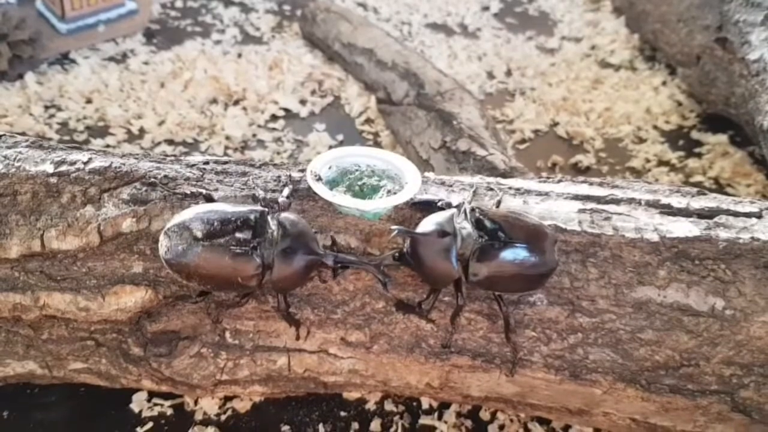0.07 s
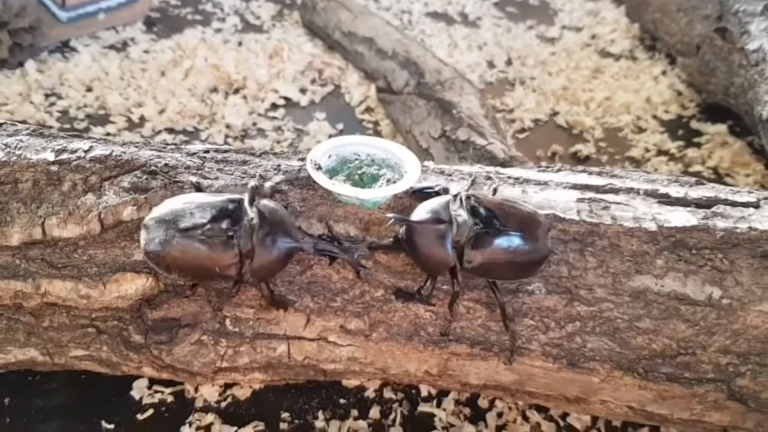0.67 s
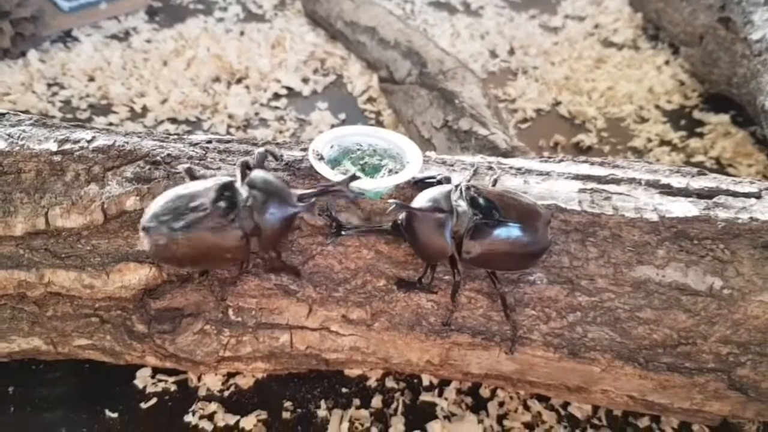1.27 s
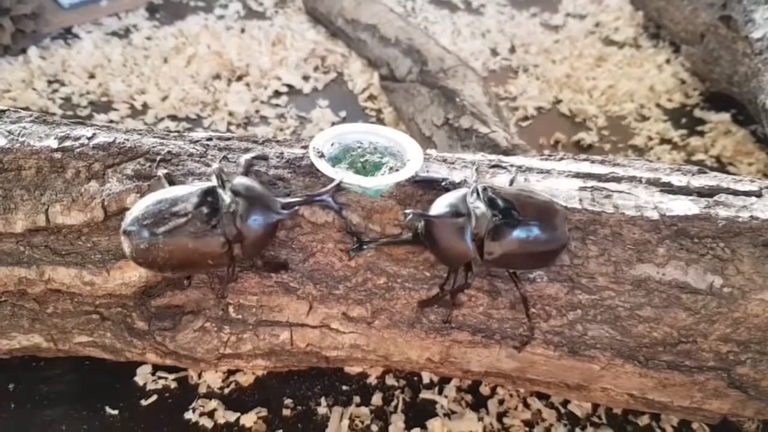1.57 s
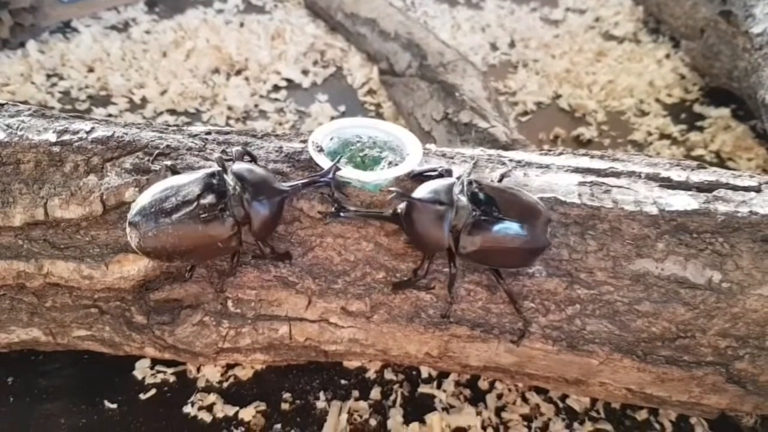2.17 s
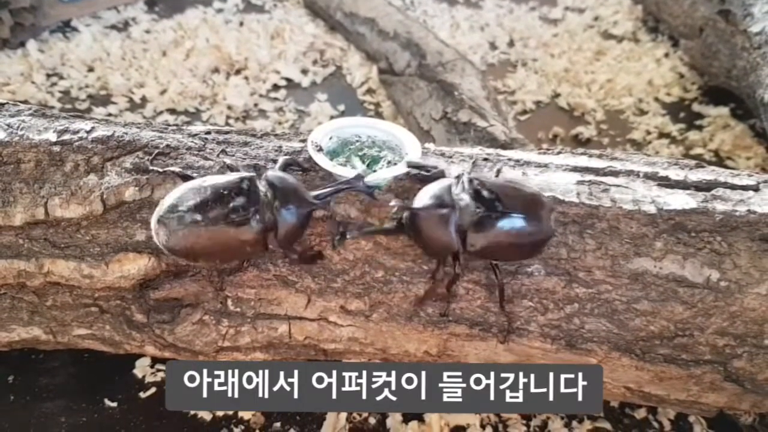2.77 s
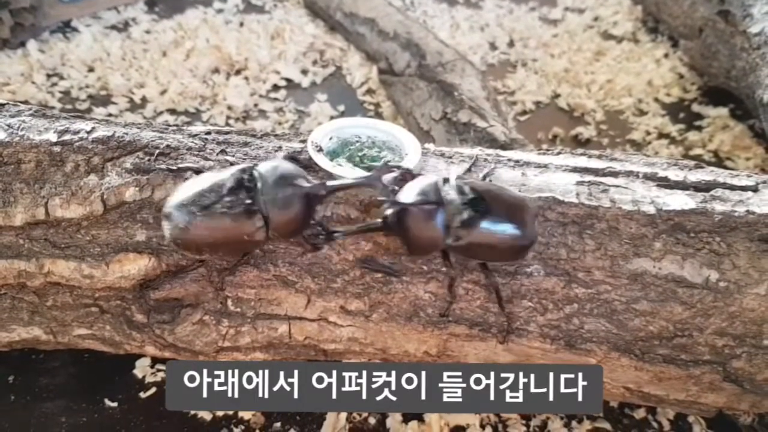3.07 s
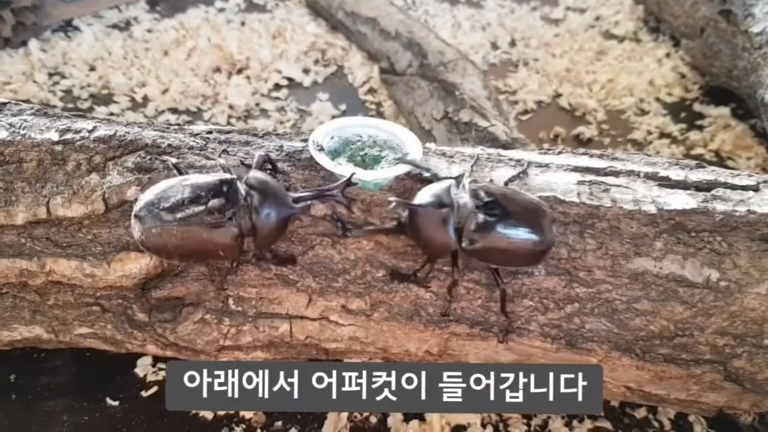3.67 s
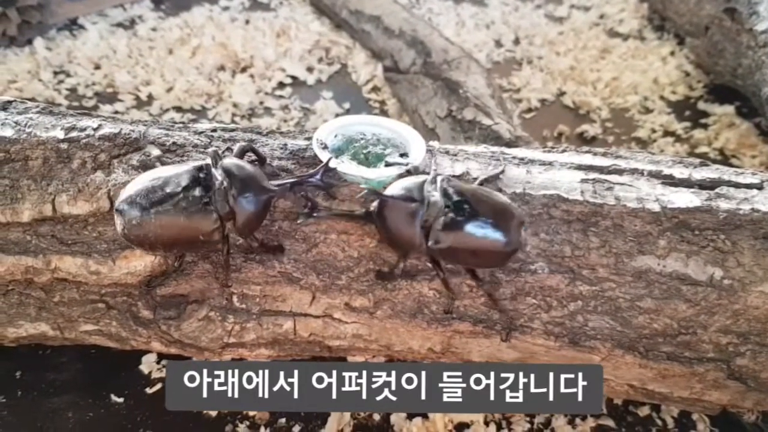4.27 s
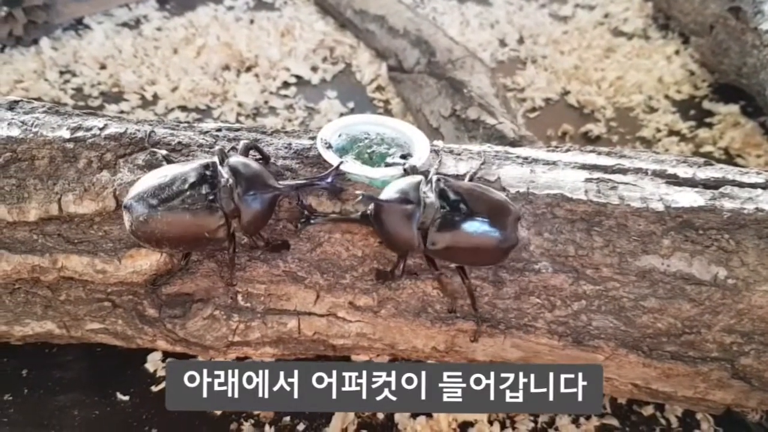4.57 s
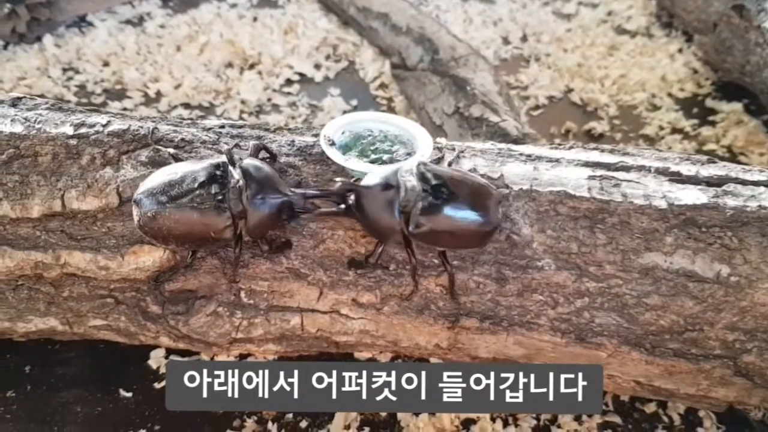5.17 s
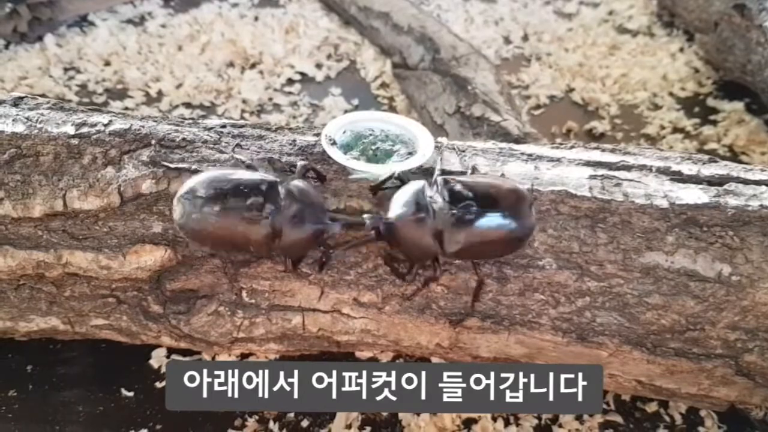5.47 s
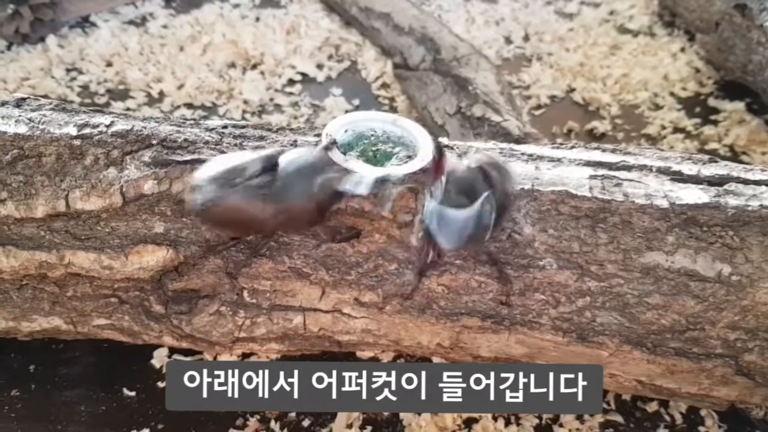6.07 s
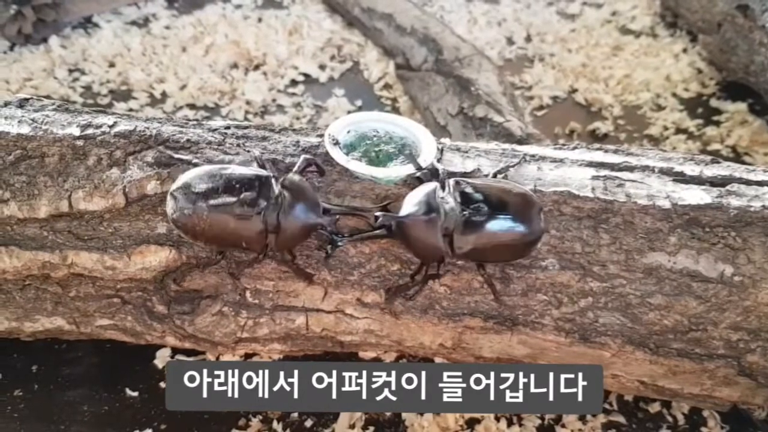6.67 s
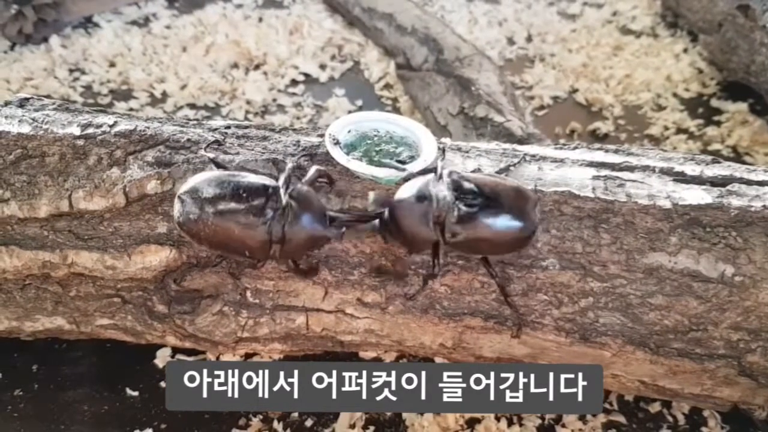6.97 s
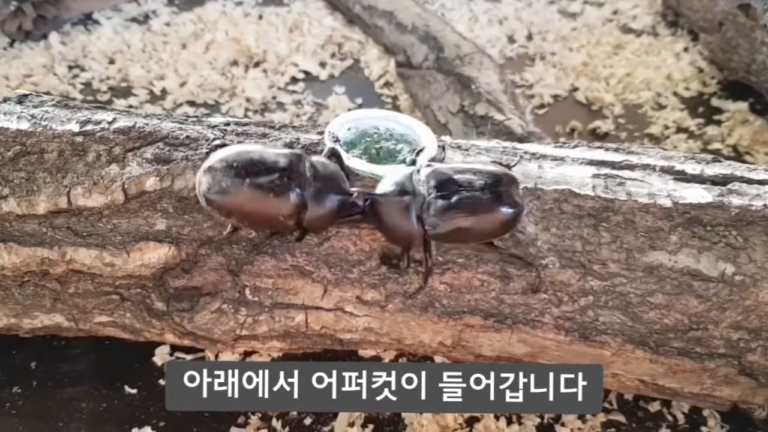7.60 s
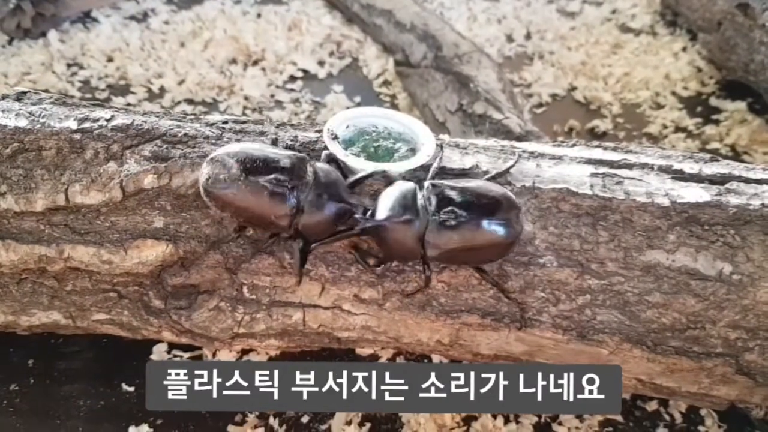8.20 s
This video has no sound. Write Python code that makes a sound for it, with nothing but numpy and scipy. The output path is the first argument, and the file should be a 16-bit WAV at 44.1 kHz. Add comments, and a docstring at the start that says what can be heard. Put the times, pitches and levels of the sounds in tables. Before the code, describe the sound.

Faint, grainy scraping and tiny clicks come from two big beetles gripping bark close to the microphone. After about five seconds, four bouts of hard shoving follow, each with brittle cracks of horn on shell, crunchy claw drags and dull knocks from the rocking log. A little cup gives a few short rings. A low room rumble and a soft appliance hum continue underneath.

```python
"""Beetles wrestling on a log

Two large beetles fight close by in a quiet room; an appliance hums in the background.
Claws drag over bark in dense stick-slip grains. Horns snap past each other and clack on shells.
Hard shoves rock the log with a low thud and jolt a small cup, which rings."""
import sys
import numpy as np
from scipy import signal
from scipy.fft import rfft, irfft, next_fast_len
from scipy.io import wavfile
from scipy.ndimage import uniform_filter1d, map_coordinates

SR = 44100
rng = np.random.default_rng(int(sys.argv[2]) if len(sys.argv) > 2 else 0)


def digitize_waveform(pressure):
    """Quantize a signal to 16-bit integers and store it at the path in sys.argv[1].

    Rows of a 2-D input are taken as channels; values are limited to [-1, 1].
    """
    field = np.atleast_2d(pressure).T
    bounded = np.clip(field, -1, 1)
    quanta = np.round(bounded * 32767).astype(np.int16)
    wavfile.write(sys.argv[1], SR, quanta)


N = 372204

# room noise spectra: f/Hz, density/dB
RUMBLE_SPECTRUM = [(15, -60), (25, -37), (35, -8.5), (49, -10), (70, -5), (91, -7), (113, -0.5), (166, -1),
                   (189, -10.5), (253, -3), (289, -7), (608, -20.5), (800, -16), (1200, -38.5), (1560, -53),
                   (2640, -120)]
HISS_SPECTRUM = [(500, -3.5), (1100, -1.5), (2100, -3), (3000, -16.5), (5000, -20), (8200, -23),
                 (11000, -17), (15500, -25)]
# appliance tones: f/Hz, level/dB
HUM_TONES = [(119, -55.5), (124, -60.5)]
# swells of its lowest and highest tone: t/s, level/dB
MAINS_SWELL = [(0, -51.5), (.6, -58), (1.15, -44.5), (1.65, -60), (2.2, -50.5), (3.2, -53.5), (4.2, -55),
               (4.75, -46.5), (5.2, -57), (6.9, -56), (8.4, -48.5)]
DRONE_SWELL = [(0, -52.5), (.5, -64.5), (1.35, -50.5), (2.6, -57), (4, -65.5), (5.3, -52.5), (6.2, -63.5),
               (8.4, -52)]
# left-right likeness: f/Hz, coherence
COHERENCE = [(60, 0.75), (130, 0.86), (290, 0.91), (640, 0.64), (1400, 0.023), (4000, 0.015),
             (15000, 0.077)]
# room decay: f/Hz, t60/s
ROOM_DECAY = [(200, 0.072), (1800, 0.31), (6000, 0.13), (15000, 0.0072)]

# resonances of log, bark with shell, and microphone ports: f/Hz, width/Hz, gain/dB
LOG_MODES = [(86.1, 19.7, 1.5), (124, 39.5, 1), (201, 35, -7), (293.4, 12, -21.5)]
BODY_MODES = [(1360, 850, 0), (1650, 42, -6), (1830, 51, -8.5), (2830, 390, -10), (4320, 340, -8.5),
              (5300, 200, -19)]
LEFT_PORT_MODES = [(2440, 81, -8.5), (3640, 300, -0.5), (5700, 900, -16), (13000, 1700, -11)]
RIGHT_PORT_MODES = [(1870, 100, -12), (2900, 350, -2), (6760, 950, 0), (10600, 4300, -8), (15300, 1400, -2)]
# partials of cup and shell: f/Hz, gain/dB, t60/s
CUP_PARTIALS = [(1650, -8, 0.11), (1780, 2.5, 0.098), (2380, -5, 0.087), (2900, -4, 0.11)]
SHELL_PARTIALS = [(1930, -12, 0.0083), (2780, -12, 0.0066), (3690, -4, 0.0037), (4170, 0.5, 0.0051),
                  (4920, -5, 0.0068), (6520, -10, 0.0046)]
# snap colours, soft to hard: f/Hz, density/dB
KNOCK_SPECTRUM = [(200, -21), (460, 3), (700, -9), (1100, -20), (1650, 2.5), (2500, -9.5), (4000, -14.5)]
CRACK_SPECTRUM = [(1500, -27), (2900, 1.5), (3200, -6.5), (3750, -1), (4500, 2.5), (5400, -0.5),
                  (6400, -4.5), (9000, -13)]
TICK_SPECTRUM = [(4500, -10), (7200, -4), (11000, 1.5), (15500, 5)]
PIN_SPECTRUM = [(8000, -19), (12000, -12), (14000, -2), (15500, 1)]
# drag colours: f/Hz, density/dB
SCRATCH_SPECTRUM = [(4000, -30), (6500, -6.5), (8300, -4), (11000, 2), (13000, -2), (15500, 3.5)]
CRUNCH_SPECTRUM = [(1500, -51), (2600, -10), (3200, 2), (3700, 5.5), (5500, 3), (7000, -9), (10000, -21)]
RASP_SPECTRUM = [(120, -40), (270, 3.5), (450, 11), (600, 1.5), (800, 3), (1130, -6.5), (1600, 0),
                 (2400, -1.5), (3200, -12), (6000, -48)]

# log settles after a shove, or a beetle lands: t/s, level/dB, tilt/(dB/octave)
LOG_THUDS = [(2.97, -36, -14), (5.426, -22.5, -10), (5.458, -32, -3), (5.482, -26, -7), (5.53, -32, -8),
             (6.004, -37, 7.5), (6.02, -29, 1), (7.168, -29.5, -1), (7.204, -35, 6.5), (7.262, -34.5, 5),
             (7.311, -44.5, 13.5), (7.328, -26.5, -9), (7.49, -29.5, 6), (7.69, -44, 9), (7.716, -32.5, 1),
             (8.265, -42, 4), (8.309, -32, 8)]
# cup is jolted: t/s, level/dB
CUP_JOLTS = [(5.443, -37), (5.469, -38.5), (7.49, -47), (7.787, -57), (8.21, -33), (8.31, -37)]
# claw skates over one ridge: t/s, length/s, f/Hz, level/dB, Q
CLAW_SKIDS = [(0.479, 0.11, 7240, -65, 1.5), (0.548, .009, 7000, -64, 4), (0.644, .012, 7200, -62.5, 2.7),
              (0.846, 0.0097, 7700, -59, 2.2), (1.177, 0.051, 11600, -48.5, 1.2),
              (1.292, 0.092, 12200, -60, 3), (1.2, .19, 2340, -62, 2.3), (1.498, 0.021, 3800, -53, 1.5),
              (2.695, 0.058, 12500, -48.5, 2.1), (2.859, 0.092, 3900, -51.5, 1.5),
              (2.898, .1, 12500, -60, 1.9), (3.294, .045, 13000, -49, 2.1), (3.546, 0.06, 2860, -61, 1.9),
              (4.296, .009, 3700, -56, 1.6), (5.661, 0.008, 6900, -45.5, 3.2),
              (5.675, .006, 7100, -43, 3.5), (7.484, 0.091, 1700, -43, 5.2), (8.192, 0.046, 1770, -38, 6),
              (8.254, 0.043, 1600, -37.5, 4.4), (8.304, 0.096, 2170, -41.5, 1.2)]
# horn strikes shell: t/s, level/dB, pitch ratio, left-right/dB
HORN_CLACKS = [(5.4347, -14.5, 1.24, -7), (5.4423, -20, 0.57, 9), (6.0172, -15, 0.91, 3),
               (6.0212, -15.5, 1.14, -5), (7.3087, -19, 0.88, 1), (7.3095, -15.5, 1.02, 2),
               (7.6896, -24, 0.81, -2), (7.6932, -27.5, 0.67, 11), (8.2722, -23.5, 0.91, 1),
               (8.3165, -27, 0.99, -2)]
# horn, shell or claw slips its hold: t/s, level/dB, hardness (<=0 knock to >=3 pin), left-right/dB
GRIP_SNAPS = [(1.193, -48, 1.8, 0), (1.204, -45, 1.8, 0), (1.3644, -54, 0, -2), (1.4365, -52, 1.2, 2),
              (1.48, -42, 2.5, 7), (2.707, -45.5, 1, 8), (2.868, -38.5, 1.5, 2), (2.882, -43, 5, 2),
              (2.908, -43, 3, 8), (3.069, -42, 1.4, -2), (3.146, -43, 2.5, -9), (3.272, -41, 4, 2),
              (3.293, -36, 2.6, 8), (3.314, -41, 4, 10), (4.1148, -44.5, 8, -2), (5.166, -51, -2, 0),
              (5.2983, -34.5, 1.5, 12), (5.368, -30, 1.6, 10), (5.3935, -29, 1.7, -2), (5.421, -25.5, 2, 8),
              (5.4336, -23, 0.7, -16), (5.434, -24.5, -1.5, 13), (5.4417, -24.5, 0.2, 9),
              (5.455, -30, 2, -4), (5.64, -41, 2.5, -2), (5.6997, -38, 1.5, -3), (5.765, -41, -1, 7),
              (5.804, -29, 1.5, -6), (5.819, -32.5, 1.5, -5), (5.847, -34, 1.5, 3), (5.912, -30, 2.5, -4),
              (5.936, -43, 2.8, 0), (6.002, -27, 0.2, -1), (6.008, -23, 1.8, 6), (6.0135, -25, 0.5, -2),
              (6.0183, -22, 0.9, 1), (6.0214, -15.5, 1.4, 2), (6.024, -23, 2.4, -2), (6.045, -30, 1, 5),
              (6.0722, -38, 6, 6), (6.1175, -34.5, 0, 3.5), (6.1755, -42, 3, 2), (6.272, -43, 2.2, 0),
              (6.3302, -42, 2.3, -5), (6.372, -46, -0.5, 0), (6.4873, -45, 6, 2), (6.518, -42, 1, 1),
              (6.5798, -44, -1.5, 7), (6.656, -55, 2, 0), (6.721, -53, 2, 0), (6.8443, -49, 2.8, 0),
              (7.099, -28.5, 1.5, 5), (7.1194, -28.5, 1, -6), (7.156, -32, 0.5, 0), (7.1641, -19, 1.5, 2),
              (7.186, -35, 0.5, 0), (7.2163, -33, 0.5, -2), (7.3084, -19.5, 0.85, 2), (7.3635, -40, -6, -2),
              (7.377, -43, 1, 1), (7.463, -29.5, 1.7, 1), (7.4905, -29.5, 0.5, 1), (7.521, -30, 1.5, 1),
              (7.553, -30.5, 2, 1), (7.6, -36.5, -0.9, 2), (7.6896, -29, 2.1, -3), (7.787, -38.5, -0.8, 3),
              (7.934, -41, 2, 0), (8.011, -33.5, 1.5, 5), (8.0227, -38, 0.5, 5), (8.2131, -28, -0.9, -6),
              (8.226, -28.5, 0.5, 2), (8.235, -31, 1, -8), (8.266, -31, 2, 6), (8.2715, -25, 2.7, 1),
              (8.308, -23.5, 1.7, 6), (8.317, -25, 1, 5), (8.33, -31, 1.3, 11), (8.417, -34.5, 0.1, 2)]
# restless feet between moves: t/s, level/dB
FOOT_SHUFFLE = [(0, -80), (.35, -69), (.72, -69.5), (1.1, -62.5), (1.4, -58), (1.6, -67), (2.35, -65.5),
                (2.65, -57.5), (3.3, -58), (3.7, -61), (4.02, -62.5), (4.55, -59), (5.1, -65.5),
                (5.3, -55.5), (6.2, -56), (6.65, -61.5), (6.8, -62), (7.0, -56), (7.45, -56.5), (7.66, -59),
                (7.78, -55.5), (7.85, -59), (8.0, -55), (8.44, -55)]
# leg drags over bark: t/s, hold/s, scratch level/dB, rasp over scratch/dB
LEG_STROKES = [(0.486, 0.073, -66, 1), (0.812, 0.053, -62.5, 1.5), (1.02, .08, -61.5, -8),
               (1.189, 0.028, -49, -3), (1.245, 0.14, -57, -3), (1.437, 0.026, -49.5, -0.5),
               (1.49, 0.04, -54.5, 0), (1.663, 0.017, -60.5, 1.5), (1.997, 0.16, -60.5, -2.5),
               (2.692, 0.054, -49, -3), (2.894, 0.092, -49, -1.5), (3.01, 0.075, -52.5, -1),
               (3.131, 0.026, -47.5, -5), (3.294, 0.044, -46.5, -1.5), (3.346, 0.097, -57, -1),
               (3.55, 0.021, -57.5, -4), (4.076, 0.21, -61, 2), (4.664, 0.047, -58, -8),
               (5.162, 0.023, -49.5, -0.5), (5.283, 0.066, -43, -2), (5.358, 0.05, -38, -6),
               (5.437, 0.017, -29, -3), (5.617, 0.17, -54, -8), (5.746, 0.11, -43.5, -3),
               (5.906, 0.027, -45.5, -3), (6.011, 0.013, -28.5, -8.5), (6.036, 0.027, -39, -14),
               (6.105, 0.12, -51.5, -9), (6.329, 0.15, -47, -7), (6.495, 0.11, -52, -1),
               (6.658, 0.082, -56.5, -4), (6.825, 0.064, -54.5, -5), (6.927, 0.018, -55, -3),
               (7.02, 0.11, -51, 0.5), (7.08, 0.1, -37, -6), (7.205, 0.017, -43.5, 1.5),
               (7.366, 0.017, -40, -2.5), (7.487, 0.047, -37, -5), (7.547, 0.05, -46.5, 0),
               (8.01, 0.22, -57, -5), (8.215, 0.04, -31.5, -8.5), (8.272, 0.049, -35.5, -7),
               (8.308, 0.022, -33.5, -5.5), (8.401, 0.03, -43.5, -2)]

TOP_HZ = 15790


def amp(db):
    return 10 ** (np.asarray(db) / 20)


def unit_rms(x):
    return x / np.sqrt(np.mean(x ** 2) + 1e-20)


def at_hz(points, hz):
    """(f/Hz, value) points interpolated on a log axis."""
    f, values = np.transpose(points)
    return np.interp(np.log(hz + 1), np.log(f), values)


def envelope(points):
    """(t/s, value) points interpolated per sample."""
    return np.interp(np.arange(N) / SR, *np.transpose(points))


def wobble(rate_hz):
    """Smooth random curve, rate_hz knots a second."""
    knots = rng.standard_normal(int(N * rate_hz / SR) + 4)
    return map_coordinates(knots, [np.arange(N) * rate_hz / SR])


def add_at(out, start_s, x):
    span = out[..., round(start_s * SR):][..., :x.shape[-1]]
    span += x[..., :span.shape[-1]]


def filtered(x, response):
    """x through a complex response of f/Hz."""
    n = x.shape[-1]
    size = next_fast_len(n + 4096, True)
    return irfft(rfft(x, size) * response(np.fft.rfftfreq(size, 1 / SR)), size)[..., :n]


def resonances(modes, f):
    """Summed causal band-pass responses."""
    return sum(amp(db) * 1j * f * width / (hz * hz - f * f + 1j * f * width) for hz, width, db in modes)


def panned(x, left_db):
    return x * amp([[left_db / 2], [-left_db / 2]])


def widened(pair):
    """Two unrelated signals as stereo: alike in the bass, apart in the treble."""
    angle = lambda f: np.arccos(at_hz(COHERENCE, f)) / 2
    mid, side = filtered(pair, lambda f: np.array([np.cos(angle(f)), np.sin(angle(f))]))
    return np.array([mid + side, mid - side])


def noise(response):
    """Coloured stereo noise, rms 1."""
    return unit_rms(filtered(widened(rng.standard_normal((2, N))), response))


def contact(force, spectrum):
    """Contact force through its colour and the ring of bark and shell, rms 1."""
    return unit_rms(filtered(force, lambda f: amp(at_hz(spectrum, f)) * (1 + resonances(BODY_MODES, f))))


def struck(partials, t, phases, attack_s, pitch=1):
    """Decaying partials of a struck body."""
    ring = sum(amp(db - 60 * t / t60_s) * np.sin(2 * np.pi * hz * pitch * t + phase)
               for (hz, db, t60_s), phase in zip(partials, phases))
    return ring * (1 - np.exp(-t / attack_s))


def background(mains_hz=59.8, drone_hz=260.7, waver_db=2.27, waver_rad=0.74):
    """Wavering appliance hum, room rumble and faint hiss."""
    t = np.arange(N) / SR
    hum = np.zeros(N)
    for hz, db in HUM_TONES + [(mains_hz, envelope(MAINS_SWELL)), (drone_hz, envelope(DRONE_SWELL))]:
        peak = np.sqrt(2) * amp(db + waver_db * wobble(rate_hz=4.9))
        hum += peak * np.sin(2 * np.pi * hz * t + waver_rad * wobble(rate_hz=4))
    rumble = amp(-48) * noise(lambda f: amp(at_hz(RUMBLE_SPECTRUM, f)))
    hiss = amp(-63.5) * noise(lambda f: amp(at_hz(HISS_SPECTRUM, f)))
    return panned(rumble + hum, left_db=2.5) + hiss


def room_echo(x):
    """Walls return a short diffuse tail, 4 ms late."""
    hz, t, spectra = signal.stft(rng.standard_normal((2, SR // 3)), SR, nperseg=256)
    decay = amp(-60 * t / at_hz(ROOM_DECAY, hz)[:, None])
    tail = signal.istft(spectra * decay, SR, nperseg=256)[1]
    tail = np.pad(tail / np.linalg.norm(tail[0]), ((0, 0), (SR // 250, 0)))
    return signal.fftconvolve(x, tail, axes=1)[:, :N]


def rocking_log(rasp_db, boom_db=4, settle_s=0.031, lowpass_hz=700, attack_s=0.0028):
    """Drags shake the log and stamps strike it; it booms at its low modes."""
    pole = np.exp(-1 / (settle_s * SR))
    shove = signal.lfilter([1 - pole], [1, -pole], amp(rasp_db + boom_db))
    boom = shove * noise(lambda f: resonances(LOG_MODES, f) / (1 + (f / lowpass_hz) ** 2))
    t = np.arange(SR // 5) / SR
    rise = 1 - np.exp(-t / attack_s)
    thuds = np.zeros(N)
    for start_s, level_db, tilt_db in LOG_THUDS:
        for hz, width_hz, db in LOG_MODES:
            octaves = np.log2(hz / LOG_MODES[0][0])
            ring = np.sin(2 * np.pi * hz * t) * np.exp(-np.pi * width_hz * t / 2)
            add_at(thuds, start_s, amp(level_db + db + tilt_db * octaves) * rise * ring)
    return panned(boom + thuds, left_db=2.5)


def cup():
    """A shove jolts the cup; its thin wall rings briefly."""
    t = np.arange(SR // 5) / SR
    out = np.zeros((2, N))
    for start_s, level_db in CUP_JOLTS:
        phases = 2 * np.pi * rng.random((len(CUP_PARTIALS), 2, 1))
        add_at(out, start_s, amp(level_db) * struck(CUP_PARTIALS, t, phases, attack_s=0.002))
    return out


def skids():
    """A skating claw excites one resonance; the rub swells and fades."""
    out = np.zeros((2, N))
    for start_s, length_s, hz, level_db, q in CLAW_SKIDS:
        swell = np.sin(np.linspace(0, np.pi, round(length_s * SR)))
        friction = rng.standard_normal((2, len(swell)))
        rub = unit_rms(filtered(friction, lambda f: resonances([(hz, hz / q, 0)], f) ** 2))
        add_at(out, start_s, amp(level_db) * swell * rub)
    return out


def clacks(spread_rad=0.48):
    """Horn on shell: a few ms of ring, pitch set by the spot struck."""
    t = np.arange(SR // 30) / SR
    out = np.zeros((2, N))
    for start_s, level_db, pitch, left_db in HORN_CLACKS:
        phases = spread_rad * rng.standard_normal((len(SHELL_PARTIALS), 2, 1))
        ring = struck(SHELL_PARTIALS, t, phases, attack_s=0.00016, pitch=pitch)
        add_at(out, start_s, panned(amp(level_db) * ring, left_db))
    return out


def faint_ticks(scratch_db, count=90, lift_db=1.5, spread_db=2):
    """Snap rows for claw tips catching at random, louder under a hard drag."""
    rows = []
    for when, size, hard, side in rng.random((count, 4)):
        level_db = scratch_db[int(when * N)] + lift_db + spread_db * (1 - 2 * size)
        rows.append((when * N / SR, level_db, 1 + np.sqrt(hard), 10 * (side - 0.5)))
    return rows


def snaps(scratch_db, rise_s=0.0007, decay_s=0.0016, crumble_db=-25, crumble_s=0.021, step_db=11):
    """A hold slips: a burst of a few ms, then faint crumbling. Hardness blends four colours."""
    t = np.arange(SR // 20) / SR
    decay = np.exp(-t / decay_s) + amp(crumble_db) * np.exp(-t / crumble_s)
    shape = (1 - np.exp(-t / rise_s)) * decay
    colours = (KNOCK_SPECTRUM, -14), (CRACK_SPECTRUM, -16.5), (TICK_SPECTRUM, -10.5), (PIN_SPECTRUM, -5.5)
    out = np.zeros((2, N))
    for start_s, level_db, hardness, left_db in GRIP_SNAPS + faint_ticks(scratch_db):
        for step, (spectrum, trim_db) in enumerate(colours):
            fall_db = step_db * abs(np.clip(hardness, 0, 3) - step)
            force = shape * (rng.standard_normal((2, len(t))) + 0.05 * rng.standard_normal(len(t)))
            burst = amp(level_db + trim_db - fall_db) * contact(force, spectrum)
            add_at(out, start_s, panned(burst, left_db))
    return out


def effort(grip_s=0.011, release_s=0.013, fidget_db=1.5, pressure_db=1):
    """Scratch and rasp levels/dB: strokes grip, hold and let go over shuffling feet."""
    t = np.arange(N) / SR
    shuffle_db = envelope(FOOT_SHUFFLE) + fidget_db * wobble(rate_hz=40)
    scratch_power = amp(shuffle_db + 1) ** 2
    rasp_power = amp(shuffle_db) ** 2
    for start_s, hold_s, level_db, woody_db in LEG_STROKES:
        before_s = np.maximum(start_s - t, 0)
        after_s = np.maximum(t - start_s - hold_s, 0)
        stroke = amp(level_db) * np.exp(-before_s / grip_s - after_s / release_s)
        scratch_power += stroke ** 2
        rasp_power += (stroke * amp(woody_db)) ** 2
    return 10 * np.log10([scratch_power, rasp_power]) + pressure_db * wobble(rate_hz=45)


def stick_slip(count=26000, spread_db=2.8, mean_decay_s=0.0009, low_hz=800):
    """Stereo train of releases, each ringing briefly at its own pitch."""
    when, pitch, hold, left, right = rng.random((5, count))
    scatter = np.clip(rng.standard_normal((2, count)) + rng.standard_normal(count), -3, 3)
    size = amp(spread_db * scatter / np.sqrt(2))
    t = np.arange(SR // 250) / SR
    hz = low_hz + pitch * (TOP_HZ - low_hz)
    decay_s = mean_decay_s * (0.5 + hold)
    rings = np.exp((2j * np.pi * hz - 1 / decay_s)[:, None] * t)
    index = ((when * N).astype(int)[:, None] + np.arange(len(t))).ravel()
    # own strength and phase on each side
    gains = size * np.exp(2j * np.pi * np.array([left, right]))
    trains = [np.bincount(index, (rings * gain[:, None]).real.ravel(), N)[:N] for gain in gains]
    return unit_rms(np.array(trains))


def crackle(load, rate_hz=130, decay_s=0.00074, lift_db=-12):
    """Drag gain as brittle fibres break; load 0 is a light touch, 1 a hard drag."""
    breaks = (rng.random(N) < rate_hz / SR) * rng.uniform(0.3, 1, N)
    bursts = signal.lfilter([1], [1, -np.exp(-1 / (decay_s * SR))], breaks)
    return 1 - load + load * unit_rms(1 + amp(lift_db) * bursts)


def bark_patches(drag, depth_db=3.6):
    """Colour drifts as the claws cross from patch to patch."""
    spectra = signal.stft(drag, nperseg=512)[2]
    drift = uniform_filter1d(rng.standard_normal(spectra.shape), size=4, axis=1)  # over frequency
    drift = uniform_filter1d(drift, size=10, axis=2)  # over time
    spectra *= amp(depth_db * unit_rms(drift))
    return unit_rms(signal.istft(spectra, nperseg=512)[1][:, :N])


def claws(scratch_db, rasp_db, bite_db_per_db=0.16, full_grip_db=-33.5):
    """Claws catch on bark fibres: light drags sizzle, hard ones crunch; the wood rasps beneath."""
    grit = np.clip((scratch_db + 75) / 55, 0.3, 0.65)  # single slips stand out under load
    load = np.clip((scratch_db + 62) / 20, 0.1, 1)
    friction = np.sqrt(grit) * stick_slip() + np.sqrt(1 - grit) * rng.standard_normal((2, N))
    drag = friction * crackle(load)
    surface = bark_patches(drag)
    scratch = contact(surface, SCRATCH_SPECTRUM) * amp(scratch_db - 3.5)
    # crunch grows faster than sizzle up to full grip
    bite_db = bite_db_per_db * np.minimum(scratch_db - full_grip_db, 0)
    crunch = contact(surface, CRUNCH_SPECTRUM) * amp(scratch_db - 5.5 + bite_db)
    rasp = contact(widened(drag), RASP_SPECTRUM) * amp(rasp_db - 1.1)
    return scratch + panned(crunch, left_db=-2) + panned(rasp, left_db=1.7)


def scene():
    """Fight, echo, log and quiet room."""
    scratch_db, rasp_db = effort()
    fight = amp(0.7) * (claws(scratch_db, rasp_db) + snaps(scratch_db) + clacks() + skids() + cup())
    return fight + amp(-17) * room_echo(fight) + rocking_log(rasp_db) + background()


def record(dry):
    """Each microphone port adds its resonances; nothing passes above TOP_HZ."""
    ports = lambda f: 1 + np.array([resonances(LEFT_PORT_MODES, f), resonances(RIGHT_PORT_MODES, f)])
    return filtered(dry, lambda f: ports(f) * (f < TOP_HZ))


dry = scene()
out = record(dry)
digitize_waveform(out)
```